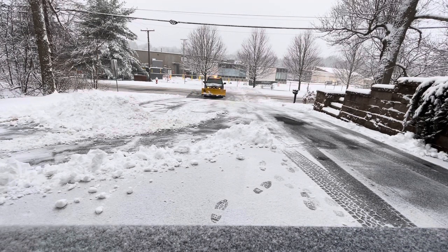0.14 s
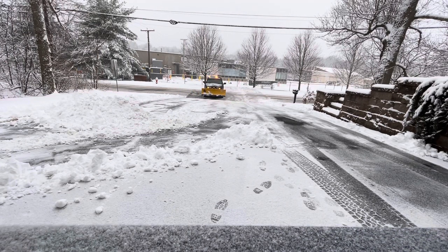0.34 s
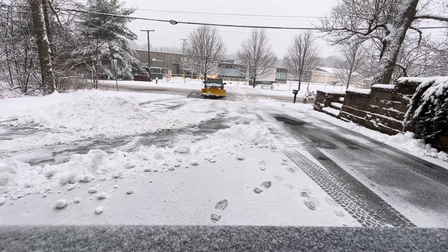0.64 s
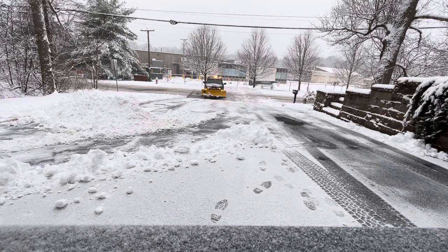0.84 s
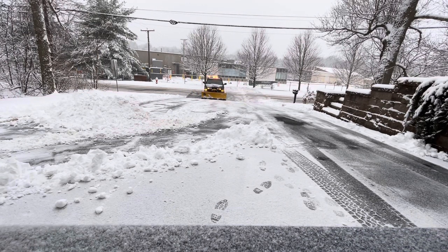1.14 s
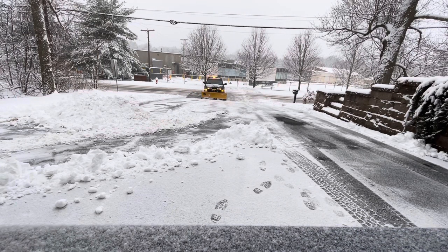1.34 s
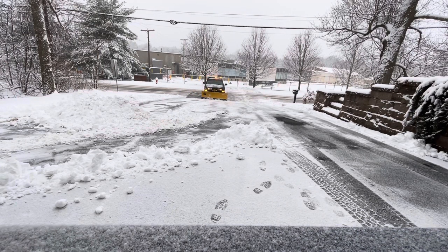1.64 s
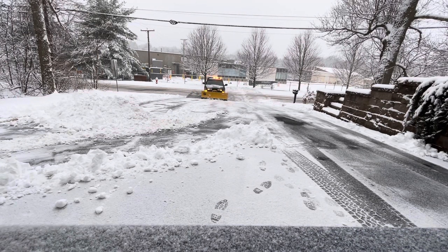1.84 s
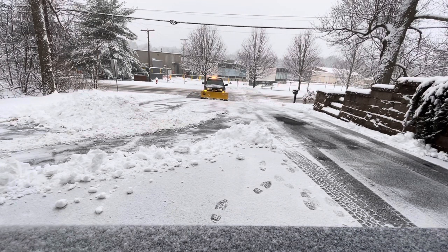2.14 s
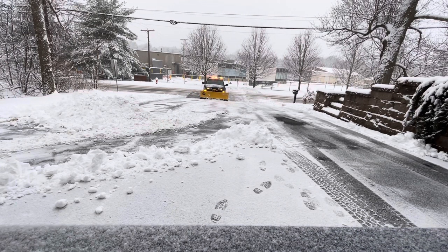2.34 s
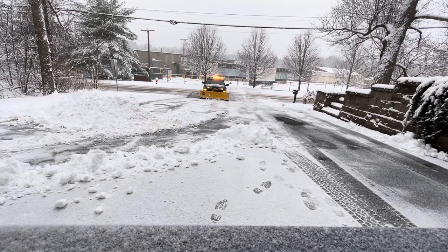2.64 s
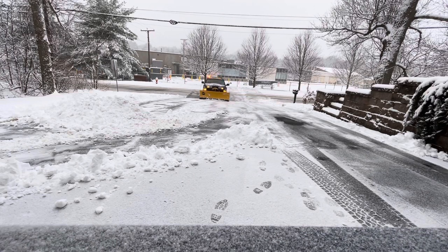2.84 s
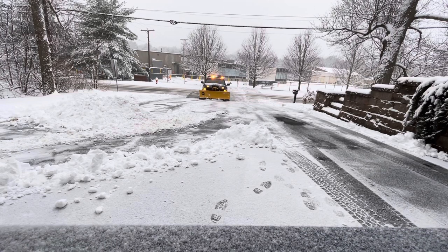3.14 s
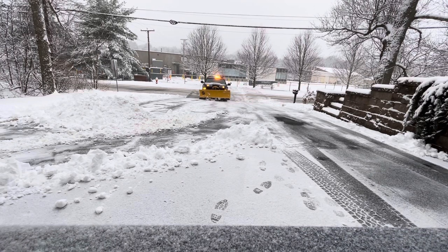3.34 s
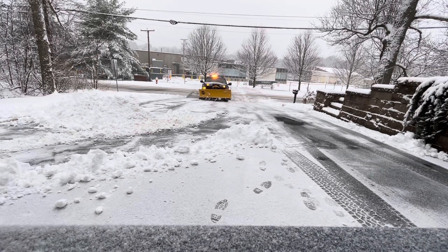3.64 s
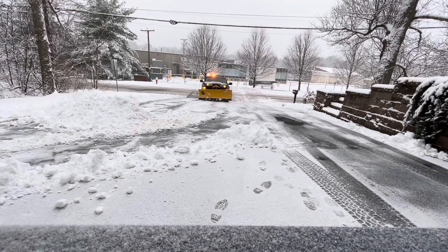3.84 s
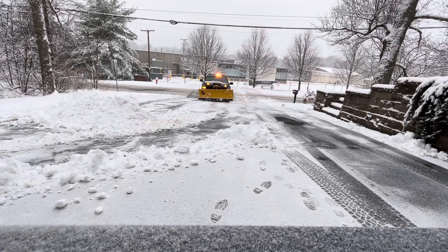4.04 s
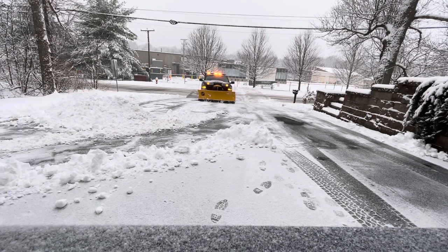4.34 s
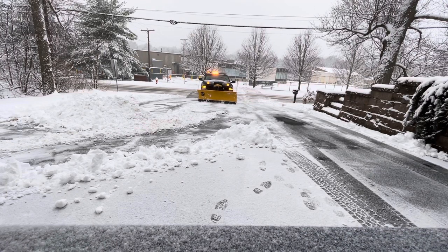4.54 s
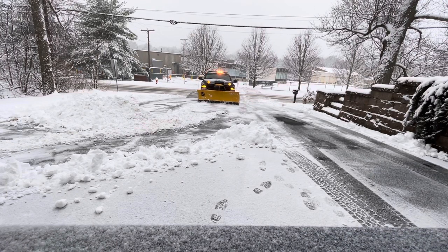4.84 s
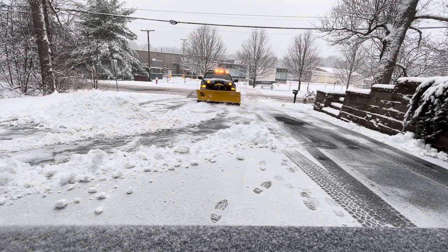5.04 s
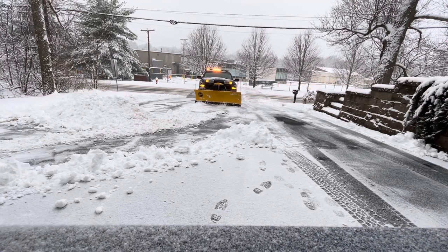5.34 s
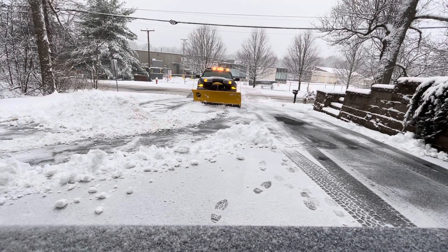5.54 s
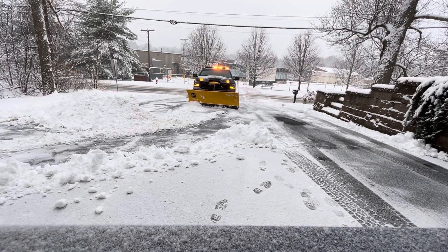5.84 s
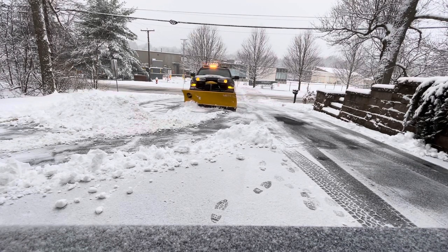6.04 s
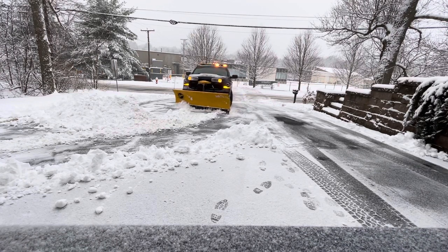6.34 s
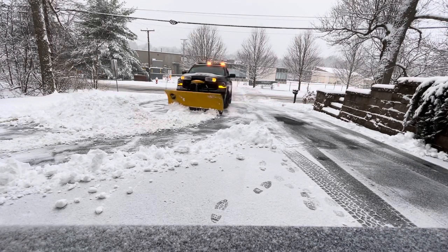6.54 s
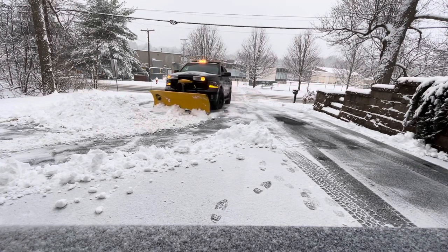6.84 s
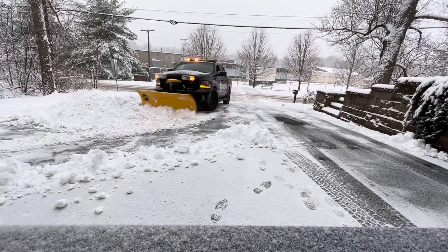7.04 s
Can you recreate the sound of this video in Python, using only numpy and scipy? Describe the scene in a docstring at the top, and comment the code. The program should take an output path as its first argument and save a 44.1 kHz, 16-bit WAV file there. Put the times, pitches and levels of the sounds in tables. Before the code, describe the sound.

Hard metallic bangs and gritty, chattering scrapes of a snowplow blade on a snowy lot, with brief squeaks, low traffic wash and a returning engine rumble.

```python
"""A truck's engine revs up, then its steel plow blade drops and pushes up a snowy lot toward two ports.
Blows and scrapes over asphalt ring the blade and frame as resonances and shake filtered-noise grit.
Gliding tones squeak now and then; the engine, a few sine tones, fades and returns, loudest at the end.
Throughout, a noise hiss grows as the truck nears, and noise makes far traffic wash along a wet road.
Short echoes and a reflection from a near hard surface color the sound."""
import sys
import numpy as np
from scipy import signal
from scipy.fft import rfft, irfft, next_fast_len
from scipy.io import wavfile
from scipy.ndimage import uniform_filter1d, map_coordinates

SR = 44100
rng = np.random.default_rng(int(sys.argv[2]) if len(sys.argv) > 2 else 0)


def persist_wave(psi):
    """Save psi, clipped to +-1, as 16-bit WAV."""
    counts = np.round(np.clip(psi, -1, 1) * 32767).astype(np.int16)
    wavfile.write(sys.argv[1], SR, np.atleast_2d(counts).T)


N = 317520  # samples, 7.2 s


def amp(db):
    """Turn decibels into a plain gain."""
    return 10 ** (np.asarray(db) / 20)


def unit(x):
    """Scale a sound to an average strength (rms) of 1."""
    return x / np.sqrt(np.mean(x ** 2) + 1e-20)


def along(points, hz, column=1):
    """Read a table column between its points, on a log frequency axis."""
    p = np.transpose(points)
    return np.interp(np.log(hz + 1), np.log(p[0] + 1), p[column])


def curves(rows):
    """Give one value per sample for each column after the time."""
    s, *cols = np.transpose(rows)
    return [np.interp(np.arange(N) / SR, s, c) for c in cols]


def wobble(rate):
    """A smooth random curve with `rate` random points a second."""
    points = rng.standard_normal(int(N * rate / SR) + 4)
    return map_coordinates(points, [np.arange(N) * rate / SR])


def filtered(x, response):
    """Multiply the spectrum of x by a response, which may shift phase as well as level."""
    # a fading mirror of the end keeps the last samples smooth
    mirror = x[..., ::-1][..., :2000] * np.linspace(1, 0, 2000)
    x = np.concatenate([x, mirror], axis=-1)
    m = next_fast_len(N + SR // 2)
    return irfft(rfft(x, m) * response(np.fft.rfftfreq(m, 1 / SR)), m)[..., :N]


def modes(table):
    """The response of a set of resonances: a narrower one rings longer after a push."""
    def response(f):
        total = 0
        for k, (center, width, db) in enumerate(table):
            resonance = 1j * f * width / (center * center - f * f + 1j * f * width)
            total = total + (-1) ** k * amp(db) * resonance
        return total
    return response


def bumps(per_s, spread_db, hiss):
    """Rough asphalt under the edge: scattered knocks of uneven size on a bed of noise."""
    happens = rng.random(N) < per_s / SR
    knocks = happens * rng.standard_normal(N) * amp(spread_db * rng.exponential(size=N))
    return unit(unit(knocks) + hiss * rng.standard_normal(N))


def rush(spectrum, alike, patchy_db):
    """Stereo noise of rms 1: random patches swell, and left and right are alike by a set amount."""
    z = signal.stft(rng.standard_normal((2, N)), nperseg=512)[2]
    field = uniform_filter1d(rng.standard_normal(z.shape[1:]), 6, 0)
    field = uniform_filter1d(field, 14, 1)
    pair = signal.istft(z * amp(patchy_db * unit(field)), nperseg=512)[1][:, :N]

    def shares(hz):
        turn = np.arccos(np.clip(along(alike, hz), -1, 1)) / 2
        return amp(along(spectrum, hz)) * [np.cos(turn), np.sin(turn)]

    mid, side = filtered(pair, shares)
    return unit(np.array([mid + side, mid - side]))


def plow():
    """Scraping and blows push on the blade and frame, which ring, and on the grit under the edge."""
    # resonances of the blade: center_hz, width_hz, level_db [relative]
    blade_modes = [(163.6, 10, 2), (249.4, 57, -9), (283, 24.8, -0.5), (367.2, 31, -1.5), (412.2, 43, -1.5),
                   (487.5, 48.3, -3.5), (541.5, 37, -4.5), (674.7, 50, -6), (888, 65, -11),
                   (988, 45.4, -10), (1198, 67, -16.5), (1427, 47, -17), (1800, 310, -29), (2087, 26, -27),
                   (2374, 28, -28.5), (2840, 120, -30)]
    # resonances of the push frame: center_hz, width_hz, level_db [relative]
    frame_modes = [(104.5, 14.2, 7.5), (123, 18, -4.5)]
    # color of the grit noise: pitch_hz, density_db [per Hz, relative]
    grit_color = [(880, -16), (1500, -8), (2090, -2.5), (3740, -13), (4110, -12), (6950, -16.5),
                  (12400, -34), (13600, -48)]

    near = np.linspace(-1, 1, N)  # the truck comes closer: more of the lowest modes arrives
    scraping, crunching, shaking = drags()
    chatter_db = 1.4 * wobble(40)
    rough = scraping * amp(chatter_db) * bumps(per_s=800, spread_db=.8, hiss=.8)
    clatter = bumps(per_s=2000, spread_db=1, hiss=1)

    blade = np.zeros(N)
    for k, mode in enumerate(blade_modes):
        mode_hz, _, mode_db = mode
        # the contact point wanders along the edge, so each mode swells on its own
        swell_db = 2.2 * wobble(12) + 1.9 * wobble(35)
        drive = rough * amp(swell_db + 8.4 * near * (mode_hz < 250))

        def spot_db(row):
            """A blow mostly wakes modes close to the pitch that its spot rings best."""
            octaves_off = np.log2(mode_hz / row[3])
            return row[1] + 4 - 7 * octaves_off ** 2 - 0.3 * mode_db

        drive += blows(0.0001, 0.0019, spot_db)  # a first strike
        drive += clatter * blows(0.0002, 0.12, spot_db)  # then rattling
        blade += (-1) ** k * filtered(drive, modes([mode]))
    # snow on the steel damps the highest ringing
    blade = filtered(blade, lambda hz: 1 / (1 + 1j * hz / 3600) ** 3)

    def boom(hz):
        return modes(frame_modes)(hz) / (1 + 1j * hz / 160) ** 2

    def hiss(hz):
        return amp(along(grit_color, hz))

    def push(response):
        """The gain with which noise of unit strength gives sound of unit strength."""
        return 1 / np.std(filtered(rng.standard_normal(N), response))

    frame = shaking * bumps(per_s=97, spread_db=0.0, hiss=1.0)
    frame += rng.standard_normal(N) * blows(0.0039, 0.5, lambda row: row[1] - 10)
    grit = crunching * amp(chatter_db + 1.5 * wobble(16)) * crunch()
    grit += clatter * blows(0.0055, 0.091, lambda row: row[1] + row[2] + 13)

    blade = amp(-0.5) * push(modes(blade_modes)) * blade
    return blade + push(boom) * filtered(frame, boom) + push(hiss) * filtered(grit, hiss)


def blows(rise_s, length_s, gain_db):
    """Each hard contact is a push that builds up and dies; gain_db works out its level from its row."""
    # hard contacts of the edge: start_s, strength_db [relative], grit_db [relative to strength],
    # best_hz [pitch that the spot rings best]
    contacts = [(0.808, -34, -32, 836), (0.891, -26.5, -22.5, 845), (1.185, -4.5, -42, 825),
                (1.277, -13, -30, 615), (1.313, -11, -36.5, 656), (1.767, -13.5, -41, 332),
                (1.966, -33, -31, 2100), (2.063, -15, -38, 720), (2.356, -28, -24, 490),
                (2.452, -15, -37, 450), (2.497, -15.5, -29, 555), (2.714, -22, -28.5, 544),
                (2.743, -20, -53, 543), (2.804, -31.5, -22, 586), (2.909, -19.5, -26.5, 690),
                (3.185, -27.5, -55, 380), (3.474, -12.5, -56, 650), (4.047, -41, -14.5, 1287),
                (4.204, -28, -20.5, 1370), (4.259, -7.5, -35.5, 526), (4.437, -28, -14.5, 550),
                (4.495, -30, -26.5, 685), (4.548, -23.5, -33.5, 500), (4.628, -21, -43, 700),
                (4.94, -20.5, -41, 584), (5.004, -20.5, -50, 450), (5.095, -17.5, -33.5, 403),
                (5.324, -22.5, -29, 634), (5.73, -15.5, -39.5, 386), (6.845, -31, -21.5, 506),
                (7.175, -22.5, -29, 920)]
    force, t = np.zeros(N + SR), np.arange(SR // 2) / SR
    burst = (1 - np.exp(-t / rise_s)) * amp(-60 * t / length_s)
    for row in contacts:
        force[round(row[0] * SR):][:len(t)] += amp(gain_db(row)) * burst
    return force[:N]


def drags():
    """Gains of scrape, grit and frame as the skipping edge drags: the powers of all drags add up."""
    # stretches on the ground: start_s, end_s, scrape_start_db, scrape_end_db, grit_start_db,
    # grit_end_db, frame_db [all levels relative]
    stretches = [(0.781, 1.146, -37.5, -52, -55.5, -68, -31.5), (1.2, 1.225, -15, -18, -19, -34, -11.5),
                 (1.307, 1.335, -19, -21.5, -36, -40, -37), (1.412, 1.532, -21.5, -30.5, -45.5, -53, -28),
                 (1.538, 1.89, -23, -20.5, -49, -53, -22.5),
                 (1.909, 1.914, -21.5, -20.5, -49.5, -39.5, -35),
                 (1.973, 2.057, -19.5, -17, -28.5, -36.5, -20.5),
                 (2.093, 2.287, -24.5, -20, -38.5, -48.5, -24.5),
                 (2.354, 2.523, -17.5, -15.5, -50, -48, -20.5), (2.714, 2.836, -18, -22, -52, -48.5, -22),
                 (2.912, 3.255, -25.5, -42, -47.5, -85, -33), (3.482, 3.802, -22, -47.5, -41, -81, -44),
                 (4.273, 4.309, -5.5, -17, -27, -40, -18), (4.342, 4.433, -16, -21.5, -36, -73, -35),
                 (4.505, 4.641, -20, -19.5, -48, -53.5, -40), (4.744, 4.85, -19.5, -25, -50, -54.5, -29.5),
                 (4.914, 5.375, -23.5, -18, -53.5, -48, -27), (5.462, 5.831, -22.5, -20.5, -52, -49.5, -23),
                 (5.93, 6.197, -33, -39, -56, -67, -27), (6.25, 6.469, -29.5, -21, -62, -64, -24),
                 (6.541, 6.719, -17, -18.5, -45.5, -52.5, -23.5),
                 (6.852, 6.912, -19, -21.5, -45, -51.5, -24), (6.978, 7.08, -26.5, -27, -53, -58, -26),
                 (7.146, 7.17, -32.5, -20, -55, -52, -25)]
    # how fast scrape, grit and frame come up as the edge bites and die as it lifts, dB per s
    rise = np.array([980, 1640, 400])[:, None]
    fall = np.array([168, 126, 80])[:, None]
    t, power = np.arange(N) / SR, 0
    for start, end, scrape0, scrape1, grit0, grit1, frame in stretches:
        u = np.clip((t - start) / (end - start), 0, 1)  # 0 at the start, 1 at the end
        scrape_db = scrape0 + (scrape1 - scrape0) * u
        grit_db = grit0 + (grit1 - grit0) * u
        held_db = np.array([scrape_db, grit_db, frame + 0 * u])
        before, after = np.maximum(start - t, 0), np.maximum(t - end, 0)
        power = power + amp(held_db - rise * before - fall * after) ** 2
    return np.sqrt(power)


def crunch():
    """Grit of several sizes: each takes its own band of noise, with its own cracking stones and swells."""
    # pitch band of each stone size, coarse to fine: pitch_hz
    sizes_hz = [2200, 4500, 7000, 11000]
    bed = bumps(per_s=3300, spread_db=2.0, hiss=1.0)

    def weight(hz, own):
        return np.exp(-8 * np.log((hz + 1) / own) ** 2) + 1e-9

    total = np.zeros(N)
    for own in sizes_hz:
        def share(hz):
            hz = np.clip(hz, 1500, 14000)
            return weight(hz, own) / sum(weight(hz, c) for c in sizes_hz)

        total += stones() * amp(3.1 * wobble(20)) * filtered(bed, share)
    return unit(stones() * total)


def stones():
    """A gain that jumps whenever a stone cracks under the edge and falls back to the even grit."""
    stones_per_s, t60_s = 17, 0.02  # t60: time to fall by 60 dB
    crack_db = 2 + 4 * rng.standard_normal(N)  # typical size and spread
    cracks = (rng.random(N) < stones_per_s / SR) * amp(crack_db)
    fading = signal.lfilter([1], [1, -amp(-60 / (t60_s * SR))], cracks)
    return unit(1 + uniform_filter1d(fading, size=200))


def engine():
    """The firing tone of eight cylinders with weaker shaft orders below it, slightly unsteady."""
    # firing rate of the engine: time_s, pitch_hz, level_db [relative]
    firing = [(0, 78.9, -49), (.15, 87.6, -37.5), (.44, 115.5, -35), (.7, 129.5, -37), (.95, 133, -61),
              (3.65, 84, -47), (3.85, 88.3, -32), (4.15, 93.8, -26), (4.6, 95, -44), (6.55, 88, -55),
              (6.8, 86, -24), (7.2, 87.3, -19)]
    hz, db = curves(firing)
    unsteady_hz = hz * (1 + .008 * wobble(12))
    shaft = 2 * np.pi * np.cumsum(unsteady_hz) / SR / 4  # four firings per turn
    orders = np.sin(4 * shaft) + amp(-15.0) * np.sin(3 * shaft) + amp(-19.5) * np.sin(2 * shaft)
    return amp(db + 3 + 1.2 * wobble(9) + 1.2 * wobble(30)) * orders


def squeaks():
    """Steel of the lift rubs on steel: thin gliding tones that swell briefly and fade."""
    # squeaks and short groans: start_s, end_s, start_hz, end_hz, level_db [relative],
    # overtones_db [added to every overtone]
    glides = [(0.908, 1.004, 1390, 1400, -39, -13), (0.997, 1.075, 1675, 1710, -38, -20),
              (2.989, 3.463, 892, 930, -36, 4.5), (4.213, 4.272, 1480, 1325, -35, -16),
              (6.991, 7.024, 742, 683, -12.5, -28), (7.062, 7.085, 680, 635, -22, -1)]
    # overtones: multiple [of the pitch], level_db [relative to the main tone]
    overtones = [(3, -24), (5, -33), (11, -47), (12, -46)]
    out = np.zeros(N)
    waver = 1 + .005 * wobble(150)  # jitter as a share of the pitch
    for start, end, hz0, hz1, db, over_db in glides:
        first = round(start * SR)
        u = np.linspace(0, 1, round((end - start) * SR))
        pitch_hz = (hz0 + (hz1 - hz0) * np.sqrt(u)) * waver[first:][:len(u)]
        turn = 2 * np.pi * np.cumsum(pitch_hz) / SR
        tone = np.sin(turn)
        for k, level in overtones:
            flicker = amp(k / 2 * wobble(1500)[first:][:len(u)])  # higher overtones break up more
            tone += amp(level + over_db) * flicker * np.sin(k * turn)
        fade_out = (1 - u) * (end - start) / .006  # over the last 6 ms
        swell = np.minimum(1, np.minimum(u / .12, fade_out))
        out[first:][:len(u)] = amp(db - 12 * u) * swell * tone
    return out * amp(1.2 * wobble(25))


def airflow():
    """Air and tyre hiss of the truck: even high noise that grows as the truck comes near."""
    # color of the hiss: pitch_hz, density_db [per Hz, relative]
    hiss_color = [(2000, -38), (4000, -5), (12000, -5.5), (13500, -21)]
    start_db, grows_db_per_s = -87.5, 4
    level_db = start_db + grows_db_per_s * np.arange(N) / SR
    return amp(level_db) * rush(hiss_color, [(1000, .5)], patchy_db=.6)


def traffic():
    """Far traffic as two noises: a low rumble and the wash of tyres on the wet road."""
    # loudness over time: time_s, rumble_db, road_db [both relative]
    levels = [(0.0, -42, -47.5), (0.72, -33.5, -48), (2.06, -30, -47.5), (2.65, -39, -51),
              (3.83, -32.5, -49), (5.15, -36, -47), (6.19, -30.5, -51.5), (6.68, -32, -43), (7.2, -31, -48)]
    # colors of road and rumble: pitch_hz, density_db [per Hz, relative]
    road_color = [(88, -28), (150, 7), (195, -16), (487, -11.5), (1130, -19), (2540, -24), (10000, -56.5),
                  (13000, -62)]
    rumble_color = [(20, -41.5), (45, -13.5), (90, -4), (130, -7.5), (200, -15.5), (320, -36), (700, -120)]
    # left-right likeness of the road: pitch_hz, likeness [1 same, 0 unrelated, -1 opposite]
    road_alike = [(60, 1), (130, 0.26), (280, 0.86), (610, -0.25), (1310, -0.43), (6110, 0.03),
                  (13200, 0.87)]
    rumble_db, road_db = curves(levels)
    road = rush(road_color, road_alike, patchy_db=.6)
    rumble = rush(rumble_color, [(30, 1.0)], patchy_db=1.5)  # the same left and right
    return amp(rumble_db) * rumble + amp(road_db + 9) * road


def ports(x):
    """The two ports hear the direct sound with their own level and phase."""
    # level difference of the ports: pitch_hz, left_minus_right_db
    balance = [(260, -0.6), (500, 0), (900, 7.5), (2000, 1.5), (3500, 5), (6000, 10.5), (9000, -13.5),
               (13000, 9)]
    # phase difference of the ports: pitch_hz, left_lead_rad
    phase_lead = [(0, 0), (950, 0.8), (1640, -0.8), (3010, 1.4), (4740, 1.3), (5430, 2.3), (6890, -0.4),
                  (9040, 3.7), (9910, 0.5), (13000, 0)]

    def both(hz):
        # each port takes half of the difference, in opposite directions
        lead = np.interp(hz, *np.transpose(phase_lead))
        half = amp(along(balance, hz) / 2) * np.exp(.5j * lead)
        return np.array([half, 1 / half])

    return filtered(np.array([x, x]), both)


def echoes(x):
    """Scattered echoes as fading noise: each frequency dies at its own speed."""
    # answer of walls and trees: pitch_hz, t60_s [time to fall by 60 dB], level_db [relative]
    answer = [(60, 0.93, -27.5), (199, 0.5, -4), (1020, 0.4, -4), (9900, 0.054, -1.5)]
    hz, t, z = signal.stft(rng.standard_normal((2, SR // 2)), SR, nperseg=1024)
    fade = amp(-60 * t / along(answer, hz)[:, None])
    strength = amp(along(answer, hz, column=2))[:, None]
    fade *= strength / np.linalg.norm(fade, axis=1, keepdims=True)
    tail = signal.istft(z * fade, SR, nperseg=1024)[1] / np.sqrt(512)
    late = np.pad(x, (500, 0))  # the echoes start 500 samples (11 ms) late
    return signal.fftconvolve(late[None], tail, axes=1)[:, :N]


def bounce(x):
    """A near surface returns a delayed copy that cuts a comb of notches into the lower range."""
    # hard surface close to the ports: delay_s, strength [gain], scatter_hz [it scatters above this]
    surface = (0.003294, 0.63, 720)
    delay_s, strength, scatter_hz = surface

    def with_copy(hz):
        delay = np.exp(-2j * np.pi * hz * delay_s)
        return 1 + strength * delay / (1 + (hz / scatter_hz) ** 2)

    return filtered(x, with_copy)


def scene():
    """Mix the truck with its echoes, hiss and traffic; the near surface reflects it all."""
    truck = plow() + engine()
    near_sound = ports(truck + squeaks()) + echoes(truck)  # the squeaks get no echoes
    return bounce(amp(-1.5) * near_sound + airflow() + traffic())


def record(dry):
    """Peaks are softly clipped; nothing is kept above the band limit."""
    top_hz = 13800
    held = dry / (1 + np.abs(dry / .95) ** 6) ** (1 / 6)
    return filtered(held, lambda hz: hz < top_hz)


dry = scene()
out = record(dry)
persist_wave(out)
```